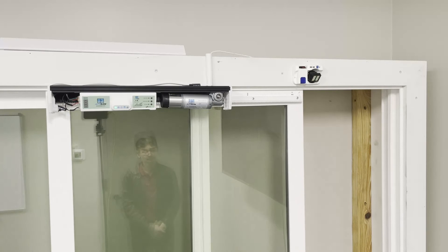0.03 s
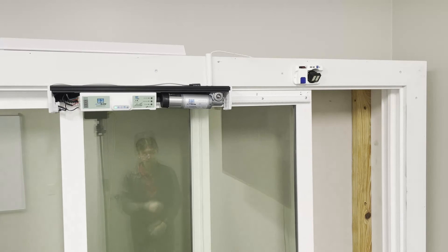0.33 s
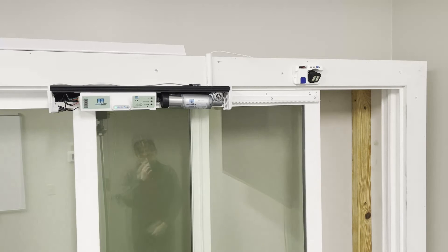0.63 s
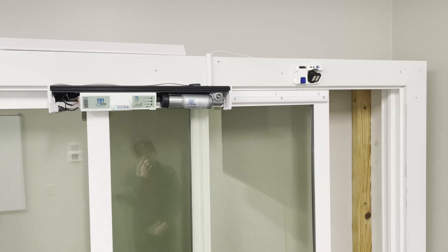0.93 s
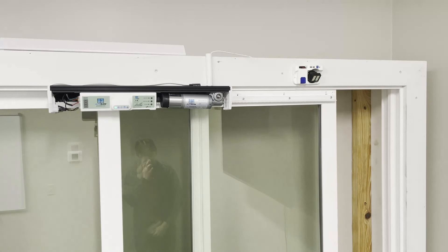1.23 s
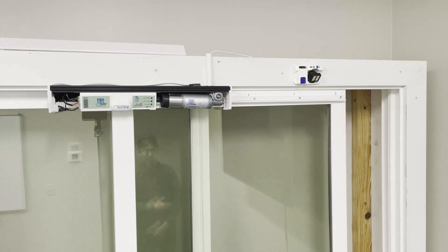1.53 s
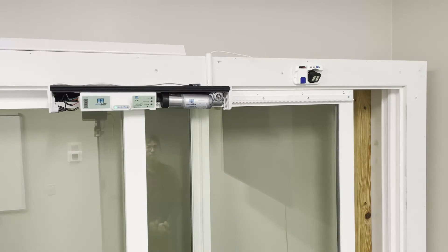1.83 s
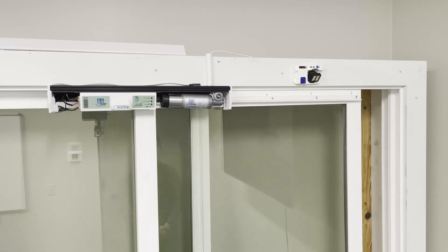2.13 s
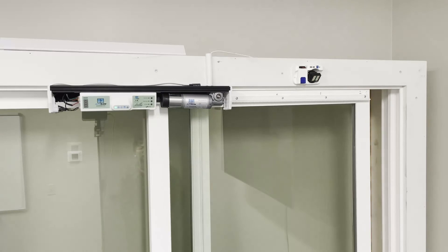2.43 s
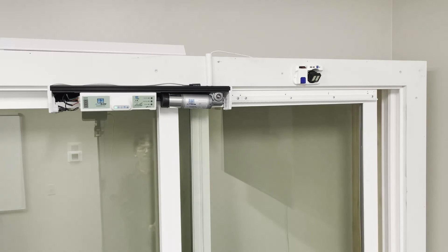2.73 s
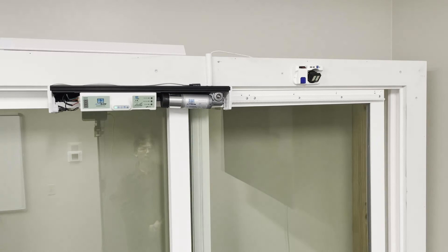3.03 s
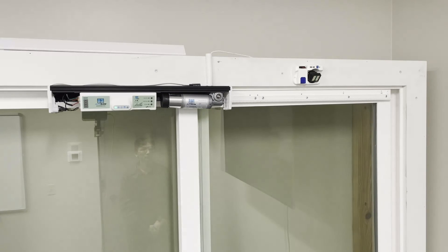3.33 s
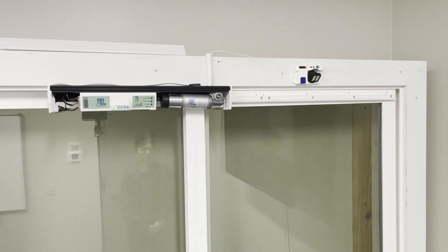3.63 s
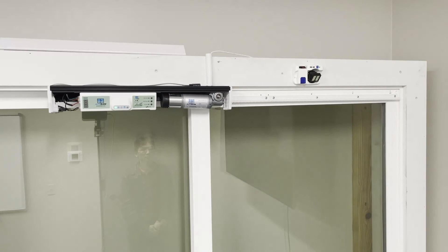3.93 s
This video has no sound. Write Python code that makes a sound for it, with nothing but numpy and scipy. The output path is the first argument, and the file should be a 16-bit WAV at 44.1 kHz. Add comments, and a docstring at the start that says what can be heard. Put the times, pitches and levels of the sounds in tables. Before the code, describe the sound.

An automatic glass door rolls with a low motor drone, then knocks and clacks shut.

```python
"""Motorised glass sliding door

A door rolls shut in a small, quiet room. The motor drones, the rollers force the pane to rumble and
boom and bump along the track, and friction gives a hiss at the seal and dry scuffs, among a few clicks.
The door slows, knocks lightly twice against the frame, exciting its modes, and shuts with two clacks."""
import sys
import numpy as np
from scipy import signal
from scipy.fft import rfft, irfft
from scipy.io import wavfile

SR = 44100
rng = np.random.default_rng(int(sys.argv[2]) if len(sys.argv) > 2 else 0)


def unload_audio(sound):
    """Save the sound as a 16-bit wav file, at the path given as the first command line argument."""
    columns = np.transpose(np.atleast_2d(sound))
    # keep every value between -1 and 1, then stretch to whole-number steps
    steps = np.round(np.clip(columns, -1, 1) * 32767)
    wavfile.write(sys.argv[1], SR, steps.astype(np.int16))


N = 176400
EVENT_SAMPLES = 16384

# Rolling strength: time_s, gain_db
ROLLING_GAIN = [(0, 0), (.75, 3.5), (1.1, -1.5), (1.5, 4), (1.8, -2.5), (2.15, 2.5), (2.6, -2.5),
                (2.85, -3.5), (3.15, -2.5), (3.5, -7.5), (3.72, -12), (4, -0.5)]
# Spectra of pane and grit: frequency_hz, density_db
RUMBLE_SPECTRUM = [(90, -9), (145, -8.5), (180, 1.5), (230, -12), (266, 1.5), (320, -13), (400, -2.5)]
GRIT_SPECTRUM = [(150, -23), (330, 3), (470, -1.5), (600, -4), (800, -9.5), (1050, -15), (1400, -15),
                 (2000, -21), (4000, -57)]
def rollers(grains_per_s=420, scatter_db=5.5):
    """Forced vibration: the rollers shake the pane and crush grit in random impulses."""
    hz = freqs(N)
    rumble = noise(along(RUMBLE_SPECTRUM, hz) + rolloff(hz, corner_hz=338, order=4))
    rumble *= undb(-51.5 + 3 * walk(13))
    grains = (rng.random(N) < grains_per_s / SR) * np.sign(rng.standard_normal(N))
    grains *= undb(scatter_db * rng.standard_normal(N))
    grit = colour(grains, along(GRIT_SPECTRUM, hz))
    grit = level(grit + signal.fftconvolve(grit[None], room())[:, :N], db=-58)
    return (rumble + grit) * undb(curve(ROLLING_GAIN))


# Strength of the pane's bass resonances: time_s, lower_db, upper_db
BOOM_ENVELOPES = [(0, -54, -52.5), (.35, -60.5, -49.5), (.6, -49, -50), (1.0, -61, -49), (1.17, -70, -53),
                  (1.27, -60, -53), (1.58, -50, -46), (1.8, -80, -55.5), (1.949, -46, -43),
                  (2.04, -69, -53), (2.152, -71, -44.5), (2.45, -73, -47.5), (2.749, -52, -54),
                  (3.099, -51, -47), (3.33, -62, -55.5), (3.46, -51, -55), (3.7, -60.5, -58),
                  (4, -49.5, -59)]
# Their spectra: frequency_hz, density_db
LOWER_RESONANCE = [(20, -28), (40, -38), (54, 0.5), (66, 1.5), (78, -11.5), (100, -40), (300, -110)]
UPPER_RESONANCE = [(20, -30), (55, -12), (76, 1), (96, -0.5), (120, -4.5), (145, -27.5), (400, -110)]
def pane_boom():
    """Resonance: the heavy, moving pane responds in two narrow bass bands."""
    hz, rows = freqs(N), np.array(BOOM_ENVELOPES)
    lower = noise(along(LOWER_RESONANCE, hz)) * undb(curve(rows[:, [0, 1]]) + 0.5)
    upper = noise(along(UPPER_RESONANCE, hz)) * undb(curve(rows[:, [0, 2]]) - 1)
    return (lower + upper) * np.sqrt(2)


# Drone of the drive: time_s, pitch_hz, level_db
MOTOR_DRONE = [(0, 62.6, -51), (.75, 69.86, -56), (1.0, 94.1, -56), (1.201, 91.53, -64.5),
               (1.58, 100.9, -51.5), (1.85, 87.46, -59), (2.3, 98.24, -53.5), (2.621, 96.5, -51),
               (2.851, 63.1, -61), (3.2, 65.2, -53), (3.6, 54, -75)]
def motor(waver=.018, wobble_db=1.5):
    """Periodic vibration: the drive's pitch rises with speed and sinks as the door brakes."""
    rows = np.array(MOTOR_DRONE)
    pitch_hz = curve(rows[:, [0, 1]]) * (1 + waver * walk(20))
    tone = np.sqrt(2) * np.sin(2 * np.pi * np.cumsum(pitch_hz) / SR)
    return tone * undb(curve(rows[:, [0, 2]]) + wobble_db * walk(28))


# Closing blows: start_s, level_db, cutoff_hz, thud_db, crack_db, note_hz, note_db
CLOSING_BLOWS = [(3.392, -45, 1820, -4, -21, 966, -3), (3.547, -48, 1780, -6, -27, 1090, -7),
                 (3.816, -58.5, 2530, 2, -15, 1680, -10), (3.849, -37.5, 6600, 5.5, -13.5, 1470, -18),
                 (3.9251, -42, 7960, -17, -12.5, 3950, -9.5)]
# Spectra of door body and first contact: frequency_hz, density_db
BODY_SPECTRUM = [(50, 2), (200, -3), (450, -2), (700, -1), (1100, -5), (1400, -1.5), (2100, -8.5),
                 (2700, -13), (3900, -10.5), (6000, -12), (9000, -28), (15000, -20)]
CRACK_SPECTRUM = [(500, -5), (2000, 7), (3900, -2.5), (6200, -13), (8500, 1.5), (11000, -6), (13000, -12),
                  (15500, -21)]
def knocks(thud_hz=565):
    """Impact excitation: each blow cracks, shakes the door and rings the frame and the struck part."""
    out = np.zeros((2, N))
    hz = freqs(EVENT_SAMPLES)
    for start_s, db, cutoff_hz, thud_db, crack_db, note_hz, note_db in CLOSING_BLOWS:
        force = contact(rise_s=.001, ring_s=.0054, snap=.14)
        body = in_room(force, along(BODY_SPECTRUM, hz), wet_db=3)
        bass_shelf_db = thud_db / (1 + (hz / thud_hz) ** 4)
        shape_db = rolloff(hz, cutoff_hz, order=2) + bass_shelf_db
        blow = unit(colour(body + undb(-1) * frame_ring(), shape_db))
        touch = contact(rise_s=.001, ring_s=.0027, snap=.25)
        crack = undb(crack_db) * in_room(touch, along(CRACK_SPECTRUM, hz), wet_db=4)
        struck = undb(note_db) * note(note_hz, t60_s=.022)
        add(out, start_s, np.sqrt(2) * blow + crack + struck, db - 2.86)
    return out


# Modes of the frame: frequency_hz, level_db, t60_s
FRAME_MODES = [(306.5, -4, 0.43), (498, 2, 0.25), (654, 3.5, 0.21), (786, 7, 0.13), (882, -0.5, 0.21),
               (973.5, 4.5, 0.082), (1217, -2, 0.14), (1353, 0.5, 0.2), (1518, -6, 0.2), (1706, 5.5, 0.072),
               (2160, -4.5, 0.13), (2520, -8, .12)]
def frame_ring(scatter_db=2):
    """Modal superposition: the frame's damped modes add, with new strengths and signs at each blow."""
    ring = 0
    for hz, db, t60_s in FRAME_MODES:
        gain = undb(db + scatter_db * rng.standard_normal()) * rng.choice([-1, 1])
        ring += gain * damped_sine(hz, t60_s)
    return unit(ring)


# Roller impacts: start_s, level_db, cutoff_hz
ROLLER_BUMPS = [(.002, -48.5, 1060), (.172, -50.5, 1080), (.205, -52.5, 950), (.29, -53.5, 1230),
                (.457, -46.5, 820), (.626, -50, 1160), (.71, -53, 1100), (.757, -59, 720),
                (.908, -46.5, 860), (1.147, -49, 930), (1.182, -48.5, 740), (1.284, -53, 795),
                (1.355, -46, 1360), (1.376, -46, 1150), (1.452, -47.5, 690), (1.485, -60, 736.6),
                (1.55, -52.5, 1090), (1.63, -51, 700), (1.69, -59, 710), (1.73, -55, 731),
                (1.835, -52, 877), (1.951, -52, 910), (1.98, -51, 1250), (2.069, -49, 925),
                (2.098, -46.5, 840), (2.174, -50, 890), (2.265, -46.5, 875), (2.349, -47, 920),
                (2.439, -46.5, 1140), (2.537, -47, 830), (2.642, -49, 998), (2.769, -54.5, 700),
                (2.882, -57.5, 965), (2.99, -53, 995), (3.085, -53.5, 890), (3.195, -48.5, 1390),
                (3.311, -49.5, 855), (3.466, -53.5, 690), (3.767, -55.5, 563)]
# Their spectrum: frequency_hz, density_db
BUMP_SPECTRUM = [(60, -6.5), (180, -8.5), (350, -4.5), (540, 6), (700, -1.5), (1000, -7.5), (1400, -1.5),
                 (2500, -10)]
def bumps():
    """Impact bandwidth: rollers bump the track and ring the frame; harder contacts reach higher."""
    out = np.zeros((2, N))
    hz = freqs(EVENT_SAMPLES)
    for start_s, db, cutoff_hz in ROLLER_BUMPS:
        force = contact(rise_s=.00077, ring_s=.015, snap=.22)
        blow = in_room(force, along(BUMP_SPECTRUM, hz), wet_db=-.5) + undb(-9) * frame_ring()
        add(out, start_s, unit(colour(blow, rolloff(hz, cutoff_hz, order=4))), db + 1.5)
    return out


# Rings of the pane: start_s, pitch_hz, level_db
PANE_NOTES = [(.004, 506.5, -51), (.718, 449, -52), (1.445, 450.4, -51), (2.266, 713.4, -57.5),
              (3.197, 539.7, -50.5), (3.311, 698, -58.5)]
def pane_rings():
    """Free vibration: the pane rings briefly and hollowly as it rolls."""
    out = np.zeros((2, N))
    for start_s, pitch_hz, db in PANE_NOTES:
        ring = note(pitch_hz, t60_s=.16)
        add(out, start_s, colour(ring, rolloff(freqs(EVENT_SAMPLES), 2 * pitch_hz, order=4)), db)
    return out


# Dry scuffs: start_s, level_db, treble_tilt_db_per_octave, rise_s
SCUFF_EVENTS = [(0.323, -55.5, 6.5, .003), (.454, -54.5, 1, 0.0036), (.628, -64.5, -2, 0.0059),
                (.654, -52.5, 6.5, 0.0058), (0.704, -62, -5, 0.0041), (0.797, -44, 0, .005),
                (0.843, -56, -1, 0.013), (0.869, -55.5, 0, 0.018), (.896, -47.5, 3, 0.0067),
                (1.127, -61, 1.5, 0.005), (1.217, -65, -4, 0.0044), (1.503, -64.5, 12, .005),
                (1.84, -62, -0.5, 0.0051), (1.956, -60, -33, 0.0026), (1.993, -59.5, 3.5, 0.0019),
                (2.092, -58.5, 6.5, 0.0048), (2.177, -57.5, -10, 0.0064), (3.06, -63.5, -4.5, 0.0081),
                (3.564, -72.5, 5, 0.00095)]
# Their spectrum: frequency_hz, density_db
SCUFF_SPECTRUM = [(300, -20), (900, 7.5), (1900, 3), (2700, 6.5), (3300, 5.5), (4200, 4), (6500, 0.5),
                  (8500, 2.5), (11000, -8), (15500, -18)]
def scuffs(echo_after_s=.0064):
    """Reflection: each short, bright scuff is followed by a weaker echo."""
    out = np.zeros((2, N))
    hz = freqs(EVENT_SAMPLES)
    for start_s, db, tilt, rise_s in SCUFF_EVENTS:
        echo = np.roll(contact(rise_s=.00038, ring_s=.0018, snap=0), int((rise_s + echo_after_s) * SR))
        scuff = contact(rise_s, ring_s=.028, snap=.37) + undb(-8) * echo
        shape_db = along(SCUFF_SPECTRUM, hz) + tilt * np.log2(np.maximum(hz, 2000))
        add(out, start_s, in_room(scuff, shape_db, wet_db=-.5), db)
    return out


# Releases of a catch: start_s, level_db
CATCH_RELEASES = [(0.4579, -58.5), (0.8007, -53.5), (0.8977, -52)]
# Their spectrum: frequency_hz, density_db
CLICK_SPECTRUM = [(1000, -13), (2500, -15), (3600, 1), (5500, 2), (8000, -11), (15000, -34)]
def clicks():
    """Impulsive release: a catch lets go so quickly that it gives a hard, dry click."""
    out = np.zeros((2, N))
    for start_s, db in CATCH_RELEASES:
        force = contact(rise_s=.0002, ring_s=.00098, snap=.5)
        click = unit(colour(force, along(CLICK_SPECTRUM, freqs(EVENT_SAMPLES))))
        add(out, start_s, click[None], db)
    return out


# Strength of the seal's hiss and rub: time_s, level_db
HISS_ENVELOPE = [(0, -61), (.42, -65.5), (.6, -59.5), (1.05, -66.5), (1.5, -63), (1.8, -68), (2.1, -66),
                 (2.5, -70.5), (3.1, -69.5), (3.45, -74.5), (3.7, -80.5), (4, -66.5)]
RUB_ENVELOPE = [(0, -65.5), (.42, -71), (.6, -67), (1.05, -69.5), (1.5, -71), (2.1, -70.5), (2.4, -71.5),
                (2.6, -82.5), (3.5, -79), (4, -94)]
# Their spectra: frequency_hz, density_db
HISS_SPECTRUM = [(500, 2), (1800, -10), (2200, -2), (2800, -11), (3700, -4.5), (5200, -2.5), (7000, -4),
                 (9000, -4.5), (11000, -9), (13500, -14.5), (16000, -15)]
RUB_SPECTRUM = [(200, -2), (1500, 2.5), (2400, 1), (3300, -2), (4200, -8.5), (7000, -24), (16000, -46)]
def seal():
    """Sliding friction: the brush seal hisses unevenly; its coarser rub fades as the door slows."""
    hz = freqs(N)
    hiss = noise(along(HISS_SPECTRUM, hz)) * undb(curve(HISS_ENVELOPE) + 2.8 * walk(28.67))
    rub = noise(along(RUB_SPECTRUM, hz)) * undb(curve(RUB_ENVELOPE) + 3.3 * walk(25.95))
    return hiss + rub


# Reverberation times: frequency_hz, t60_s
ROOM_DECAY = [(100, 0.23), (500, 0.61), (1500, 0.28), (4000, 0.27), (10000, 0.11)]
def room(gap_s=.0015, build_s=.014):
    """Reverberation: a diffuse tail, different on each side, whose treble dies first."""
    t, hz = times(EVENT_SAMPLES), freqs(EVENT_SAMPLES)
    spectrum = rfft(rng.standard_normal((2, len(t))))
    tail = 0
    for band_hz, t60_s in ROOM_DECAY:
        share = along([(f, f == band_hz) for f, _ in ROOM_DECAY], hz)
        tail += irfft(spectrum * share) * undb(-60 * t / t60_s)
    return unit(tail * np.clip((t - gap_s) / build_s, 0, 1))


# Still room and idling drive: frequency_hz, density_db
AMBIENT_SPECTRUM = [(20, -22), (32, -2), (60, -1), (90, -3.5), (150, -4.5), (260, -9), (400, -24),
                    (520, -17.5), (750, -44), (1200, -45), (3200, -46.5), (5300, -40.5), (9000, -76),
                    (15000, -50)]
def background(hum_hz=59.5, level_db=-55.5):
    """Noise floor: steady room tone and an equally strong mains hum."""
    hum = level(np.sin(2 * np.pi * hum_hz * times()), level_db)
    return noise(along(AMBIENT_SPECTRUM, freqs(N))) * undb(level_db) + hum


def contact(rise_s, ring_s, snap):
    """Transient excitation: a dense, exponentially dying rattle with an impulse at its peak."""
    t = times(EVENT_SAMPLES)
    envelope = np.minimum(t / rise_s, 1) * np.exp(-np.maximum(t - rise_s, 0) / ring_s)
    force = unit(rng.standard_normal(len(t)) * envelope)
    force[int(rise_s * SR)] += snap
    return force


def damped_sine(hz, t60_s):
    """Damped oscillation, falling 60 dB in t60_s."""
    t = times(EVENT_SAMPLES)
    return np.sin(2 * np.pi * hz * t) * undb(-60 * t / t60_s)


def note(hz, t60_s):
    """Convolution with the room gives one dying resonance its tail."""
    direct = unit(damped_sine(hz, t60_s))
    tail = unit(signal.fftconvolve(direct[None], room())[:, :EVENT_SAMPLES])
    return direct + undb(-3) * tail


def in_room(x, db, wet_db):
    """Direct and diffuse sound, both through one filter."""
    return unit(colour(x, db)) + undb(wet_db) * unit(colour(room(), db))


def undb(db):
    """Decibels to gain."""
    return 10 ** (np.asarray(db) / 20)


def times(size=N):
    """Time of every sample."""
    return np.arange(size) / SR


def freqs(size):
    """Frequency of every bin."""
    return np.maximum(np.arange(size // 2 + 1) * SR / size, 1)


def curve(rows):
    """Linear interpolation of (time_s, value) rows."""
    return np.interp(times(), *np.array(rows).T)


def along(rows, hz):
    """Log-frequency interpolation of (frequency_hz, value) rows."""
    row_hz, values = np.array(rows).T
    return np.interp(np.log(hz), np.log(row_hz), values)


def rolloff(hz, corner_hz, order):
    """Low-pass slope in dB."""
    return -10 * np.log10(1 + (hz / corner_hz) ** (2 * order))


def colour(x, db):
    """Minimum-phase filter with the given gain in dB per bin."""
    size = x.shape[-1]
    cepstrum = irfft(np.log(undb(db)), size)
    cepstrum[1:size // 2] *= 2
    cepstrum[size // 2 + 1:] = 0
    return irfft(rfft(x) * np.exp(rfft(cepstrum)), size)


def level(x, db):
    """Set the rms level."""
    return x * undb(db) / np.sqrt(np.mean(x ** 2))


def unit(x):
    """Scale to unit energy per channel."""
    return x / np.sqrt(np.mean(np.sum(x ** 2, axis=-1)))


def walk(rate_hz):
    """Slow random fluctuation with a spread near 1."""
    step = int(SR / rate_hz)
    return np.interp(np.arange(N) / step, np.arange(400), rng.standard_normal(400))


def noise(db):
    """Two uncorrelated noises of one spectrum, rms 1."""
    return level(irfft(rfft(rng.standard_normal((2, N))) * undb(db), N), 0)


def add(out, start_s, x, db):
    """Mix in an event; db is the level of unit energy spread over 20 ms."""
    i = int(start_s * SR)
    out[:, i:i + x.shape[1]] += (x * undb(db) * np.sqrt(SR * .02))[:, :N - i]


def scene():
    """Superposition: the pressures of all sources add."""
    travel = pane_boom() + motor() + rollers() + seal() + bumps() + pane_rings()
    return travel + scuffs() + clicks() + knocks() + background()


# Stereo width: frequency_hz, side_gain_db
PAIR_WIDTH = [(60, -22), (130, -14), (260, -13), (600, -3), (1500, -1.5), (4000, -5.5), (12000, -9.5)]
# Balance: frequency_hz, left_minus_right_db
PAIR_BALANCE = [(60, -3), (110, -2.5), (200, -4), (380, -1.5), (700, -2.5), (1290, -1.5), (2380, 3),
                (4400, 3.5), (8120, 1.5), (15000, 2.0)]
# Phase difference: frequency_hz, left_lead_rad
PAIR_PHASE = [(20, 0), (2000, .1), (5000, .5), (6700, -.5), (7600, -2.5), (9000, -3.7), (10400, -5.7),
              (13000, -6.8), (16000, -9)]
def record(dry, top_hz=15850):
    """Spaced microphones: two close ports share most bass, differ in level and phase, and cut the top."""
    hz, sides = freqs(2 * N), np.array([[1], [-1]])
    left, right = rfft(dry, 2 * N)
    mid, side = (left + right) / 2, (left - right) / 2
    pair = mid + sides * side * undb(along(PAIR_WIDTH, hz))
    pair *= undb(sides * along(PAIR_BALANCE, hz) / 2)
    pair *= np.exp(1j * sides * along(PAIR_PHASE, hz) / 2)
    lowpass = signal.ellip(8, .2, 70, top_hz, fs=SR, output="sos")
    return signal.sosfilt(lowpass, irfft(pair)[:, :N])


dry = scene()
out = record(dry)
unload_audio(out)
```